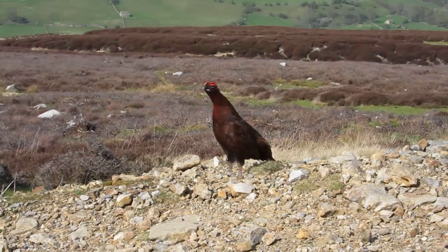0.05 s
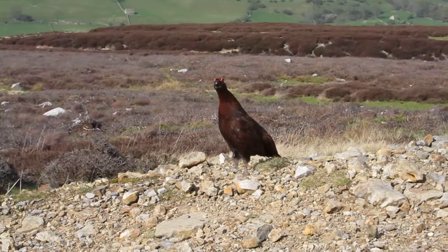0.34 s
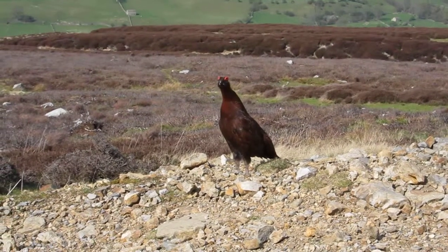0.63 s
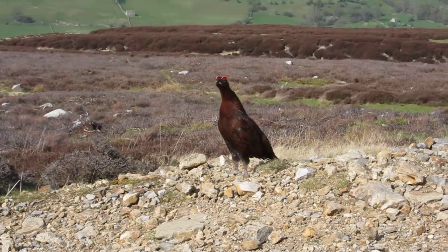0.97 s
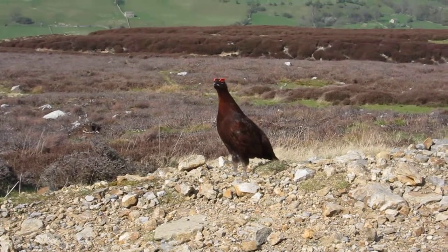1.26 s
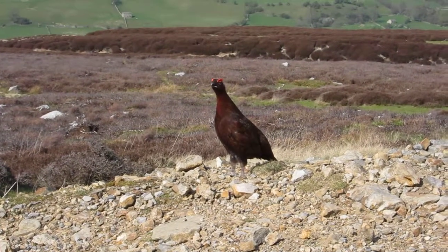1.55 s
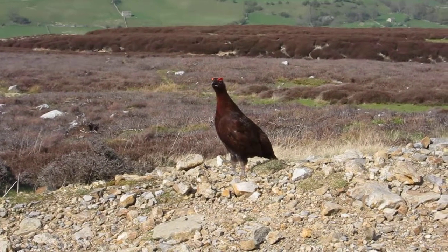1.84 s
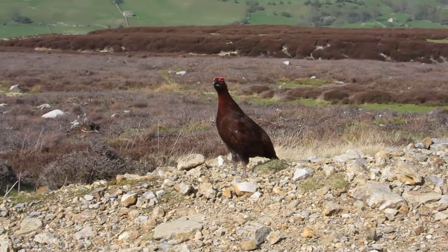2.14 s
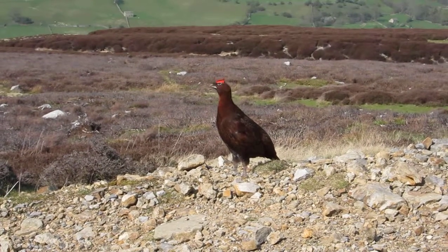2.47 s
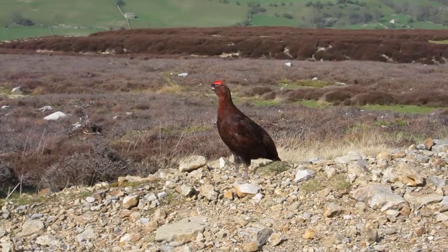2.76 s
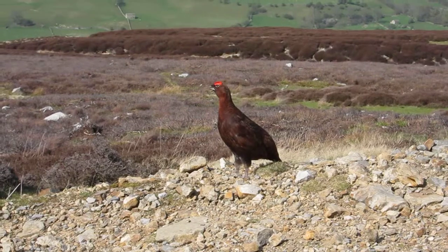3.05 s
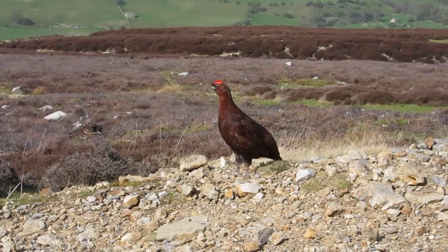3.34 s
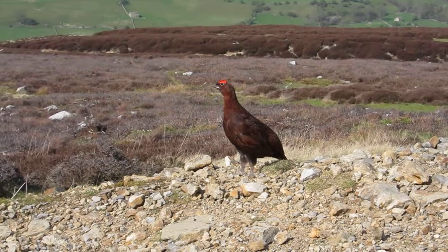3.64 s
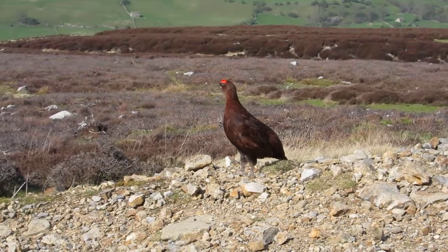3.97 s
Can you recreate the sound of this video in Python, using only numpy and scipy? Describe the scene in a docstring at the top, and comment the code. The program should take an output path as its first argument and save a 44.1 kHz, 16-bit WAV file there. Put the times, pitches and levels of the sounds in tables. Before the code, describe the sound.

A grouse rattles off harsh, quickening croaks that fade into clucks, with light wind.

```python
"""Open moorland: a red grouse rattles ten harsh croaks that speed up and shorten, two clucks, six ticks.
Each croak is eight syrinx pulses that ring throat and bill and scatter off stones and heather.
Wind buffets the microphones over a faint hiss; the camera whines thinly, and clicks and rustles
as it is handled."""
import sys
import numpy as np
from scipy import signal
from scipy.fft import rfft, irfft
from scipy.io import wavfile
from scipy.ndimage import uniform_filter1d

SR = 44100
rng = np.random.default_rng(int(sys.argv[2]) if len(sys.argv) > 2 else 0)


def to_wav(sig):
    """Store sig (one row per channel, or 1-D mono) as 16-bit WAV at the path in sys.argv[1].

    Samples outside -1..1 are clipped; the rate is SR.
    """
    pcm = np.clip(np.atleast_2d(sig), -1, 1) * 32767
    pcm = np.round(pcm).astype(np.int16)
    wavfile.write(sys.argv[1], SR, pcm.T)  # frames by channels


N = 176400
T = np.arange(N) / SR
FREQS = np.arange(N // 2 + 1) * SR / N
PULSE_SAMPLES = 2048


def undb(db):
    """Decibels to gain."""
    return 10 ** (np.asarray(db) / 20)


def unit(x):
    """Scale to rms 1."""
    return x / np.sqrt(np.mean(x ** 2))


def over_time(rows, column=1):
    """Interpolate one column linearly; column 0 is time in seconds."""
    return np.interp(T, np.array(rows)[:, 0], np.array(rows)[:, column])


def over_pitch(rows, freqs=FREQS):
    """Interpolate (Hz, value) rows over log frequency."""
    hz, value = np.array(rows, float).T
    return np.interp(np.log(freqs + 1), np.log(hz + 1), value)


def minimum_phase(db):
    """Causal frequency response from a dB curve."""
    cepstrum = irfft(np.log(undb(db)))
    cepstrum[1:len(db) - 1] *= 2
    cepstrum[len(db):] = 0
    return np.exp(rfft(cepstrum))


def noise(colour):
    """Noise shaped by (Hz, dB) rows, rms 1."""
    return unit(irfft(rfft(rng.standard_normal(N)) * undb(over_pitch(colour))))


def wide_noise(colour):
    """Stereo noise; the sides decorrelate towards the treble, the left leads."""
    uncorrelated_hz, lag_s = 6000, .00014
    side = irfft(rfft(noise(colour)) * np.clip(FREQS / uncorrelated_hz, 0, 1))
    left, right = noise(colour) + np.array([side, -side])
    return unit(np.array([left, np.roll(right, int(lag_s * SR))]))


def drift(rate_hz):
    """Smooth random drift, rms 1."""
    hold = int(SR / rate_hz)
    steps = np.repeat(rng.standard_normal(N // hold + 1), hold)
    return unit(uniform_filter1d(steps, hold)[:N])


def hiss_and_whine():
    """Open-air hiss and the camera's thin whine, slowly growing together."""
    # Each row: time in seconds, relative level in dB.
    levels = [(0, -62.5), (.8, -58.5), (1.4, -57.5), (2.1, -54), (3.2, -51.5), (4, -50)]
    # Each row: frequency in Hz, hiss level in dB.
    hiss_colour = [(290, -27), (500, -8.5), (631, -7.5), (1030, -8), (1690, -8.5), (6420, -21),
                   (7310, -31.5), (8330, -40), (8700, -28), (16000, -27)]
    whine_hz = 8806 + 5 * drift(30)
    whine = undb(-21.5) * unit(np.sin(2 * np.pi * np.cumsum(whine_hz) / SR))
    hiss = wide_noise(hiss_colour) * undb(.6 * drift(9.1))
    return (hiss + whine) * undb(over_time(levels) - 1.5)


def handling():
    """Small clicks and one brushing rustle at the camera."""
    # Each row: start in seconds, relative level in dB, tilt in dB per octave.
    clicks = [(1.619, -49, -7.5), (1.96, -38, 9.5), (2.352, -42, -5), (2.363, -43, -5.5), (2.966, -37, 6.5),
              (2.971, -39.5, 0.5), (3.363, -48, 2), (3.620, -40.5, 1), (3.868, -40, -5.5), (3.95, -45, 2),
              (3.958, -44.5, -1.5)]
    # Each row of both spectra: frequency in Hz, level in dB.
    click_colour = [(300, -18.5), (950, 8), (2500, -2), (3700, -8.5), (5200, -5.5), (9000, -38),
                    (16000, -29)]
    rustle_colour = [(350, -18), (600, -19), (1280, -2), (4110, -6.5), (5950, -14.5), (7020, -17),
                     (8390, -41), (8740, -22.5), (16000, -17)]
    decay_s = .003
    out = np.zeros((2, N))
    for at_s, db, tilt in clicks:
        colour = [(hz, level + tilt * np.log2(hz)) for hz, level in click_colour]
        envelope = (T >= at_s) * np.exp(-np.abs(T - at_s) / decay_s)
        out += wide_noise(colour) * undb(db + 5.5) * envelope
    start_s, end_s, rise_s, fall_s = 3.605, 4.026, .013, .34
    swell = np.clip((T - start_s) / rise_s, 0, 1) * np.clip((end_s - T) / fall_s, 0, 1)
    rustle = wide_noise(rustle_colour) * swell * undb(-49 + drift(40))
    return out + rustle


def wind():
    """Gusts rumble on each microphone, with a few sharp buffets."""
    # Each row: time in seconds, relative level in dB, left minus right in dB.
    gusts = [(0.0, -30.5, -2), (0.07, -25, 3), (0.39, -36.5, -12.5), (0.41, -35, 4.5), (0.62, -34, -12),
             (0.79, -33, 18.5), (0.83, -27, -13), (0.86, -35, 0.5), (1.75, -36, -4), (1.83, -25.5, 11.5),
             (1.89, -32.5, 17), (1.93, -38, 2), (2.09, -38, 3.5), (2.13, -30.5, -13.5), (2.25, -29.5, 9.5),
             (2.49, -35, -12), (2.6, -31, 7.0), (2.65, -35, 4), (2.71, -36.5, -7.5), (2.83, -41.5, 9),
             (2.88, -37, -11), (2.99, -40.5, 7.5), (3.05, -32.5, -1.5), (3.34, -34.5, 7), (3.38, -35, -8.5),
             (3.46, -31.5, 7), (3.54, -31.5, 1), (3.58, -30, 15.5), (3.6, -35.5, 3), (3.71, -39.5, -5.5),
             (3.82, -40.5, 14.0), (4.0, -39, 4.5)]
    # Each row: frequency in Hz, level in dB.
    colour = [(12, -24), (20, -9), (54, 0), (112, -4.5), (183, -12), (236, -17.5), (341, -25.5),
              (476, -34.5), (900, -48), (1170, -46), (1980, -120)]
    # Each row: centre in seconds, envelope peak in dB before panning, pitch in Hz, width in seconds.
    buffets = [(0.069, -16, 176, 0.007), (0.306, -24.5, 140, .007), (0.831, -17.5, 253, 0.0026),
               (1.81, -12.5, 148.3, 0.0033), (1.878, -17, 127, 0.0051), (2.133, -30, 123.7, 0.012),
               (3.055, -32, 226, .005), (2.295, -24.5, 203, .004), (3.129, -21, 167, 0.011),
               (3.483, -20, 128, 0.0063), (3.569, -15, 115, 0.0066)]
    shared_power = .22
    common = np.sqrt(shared_power) * noise(colour)
    rumble = np.array([common + np.sqrt(1 - shared_power) * noise(colour) for _ in range(2)])
    flutter_db = drift(25.24)
    out = rumble * undb(over_time(gusts) + 1.5 + flutter_db)
    for at_s, db, hz, width_s in buffets:
        phase_rad = rng.normal(0, .78, (2, 1))
        envelope = undb(db) / (1 + ((T - at_s) / width_s) ** 2) ** 2
        out += envelope * np.cos(2 * np.pi * hz * (T - at_s) + phase_rad)
    pan_db = over_time(gusts, column=2)
    return out * undb([pan_db / 2, -pan_db / 2])


def scatter(x, db, t60_s):
    """Decaying, dulled reflections off stones and heather, alike at both microphones."""
    tail = rng.standard_normal(N) * undb(-60 * T / t60_s)
    lowpass = 1 / np.hypot(1, FREQS / 4000)
    return undb(db) * irfft(rfft(x) * rfft(tail) * lowpass / np.linalg.norm(tail))


def syrinx():
    """List pulses as (start s, body dB, treble dB, resonance Hz, ring dB); a soft one leads each note."""
    # Each row: start in seconds, relative level in dB, nominal length in seconds, base pulse rate in Hz,
    # opening resonance in Hz, bill ring in dB.
    croaks = [(.017, -0.5, 0.023, 221.8, 1650, -1.5), (.0976, 0, 0.024, 225, 1650, -2),
              (0.1787, 0.5, 0.024, 229.6, 1700, -0.5), (0.2593, 0.5, 0.023, 231.7, 1750, -8),
              (0.3358, 1, 0.02, 236.4, 1850, -1.5), (0.4075, -0.5, 0.02, 238.1, 1950, -4.5),
              (0.471, 0, 0.018, 235.4, 2050, 0), (0.532, 0, 0.016, 227, 2080, 4.5),
              (0.5874, -2, 0.014, 217.8, 2000, 11), (0.6388, -4.5, 0.013, 201.6, 2000, 9)]
    # Two clucks, then six ticks, one main pulse each. Each row: start in seconds, relative level in dB.
    clucks = [(.6937, -12), (0.7835, -18), (.8752, -34), (0.9191, -35), (.9640, -35), (1.0084, -32.5),
              (1.0550, -29), (1.1036, -28.5)]
    lead_s, jitter, shimmer_db = .0063, .008, .5
    crest_share, onset_db, release_db = .48, -4, -13
    crest_hz, end_hz = 2270, 2060  # the resonance scoops up, then sinks
    pulses = []
    for start_s, db, length_s, rate_hz, start_hz, ring_db in croaks:
        lead_db = db - 16 - 26 * start_s  # fainter as the rattle goes on
        pulses.append((start_s - lead_s, lead_db, lead_db, start_hz, ring_db))
        age_s = 0
        for k, (late, strong) in enumerate(rng.standard_normal(size=(8, 2))):
            progress = age_s / length_s
            opening = max(1 - progress / crest_share, 0)
            closing = max(progress - crest_share, 0) / (1 - crest_share)
            effort_db = db + shimmer_db * strong
            body_db = effort_db + onset_db * opening + release_db * closing ** 1.5
            treble_db = effort_db + 3 - 16 * progress ** 2  # strongest at the onset
            hz = crest_hz + (start_hz - crest_hz) * opening + (end_hz - crest_hz) * closing
            pulses.append((start_s + age_s, body_db, treble_db, hz, ring_db))
            stretch = (1.25, 1.05)[k] if k < 2 else 1 + .07 * closing  # first and last cycles run long
            age_s += stretch * (1 + jitter * late) / rate_hz
    cluck_hz, cluck_ring_db = 2120, 15.5
    for start_s, db in clucks:
        for at_s, body_db in ((start_s - lead_s, db - 19), (start_s, db)):
            pulses.append((at_s, body_db, body_db - 4.5, cluck_hz, cluck_ring_db))
    return pulses


def throat_pulse(body_db, treble_db, resonance_hz, ring_db):
    """One pulse, its weaker rebound and a puff of rasping air ring throat and bill."""
    # Throat and bill response. Each row: frequency in Hz, relative gain in dB.
    throat = [(150, -22), (330, -13.5), (450, -14), (680, -5.5), (900, -17.5), (1050, -32.5), (1200, -23.5),
              (1400, -20), (1850, -16.5), (2100, -11), (2380, -14.5), (2600, -19.5), (2950, -29.5),
              (3400, -21.5), (4000, -16.5), (4350, -33.5), (5000, -39.5), (5600, -26), (6300, -41.5),
              (7050, -31.5), (8000, -46.5), (9000, -42), (10200, -47), (11400, -41), (14500, -42.5),
              (16000, -59.5)]
    chest_hz, chest_follow, treble_hz = 1000, .48, 4600  # the low band follows the effort less
    peak_db, peak_width_hz, ring_hz, ring_width_hz = 18, 398, 5343, 190
    rebound_s, rebound_db, rasp_decay_s, low_rasp_db = .002446, -8, .003, -14
    f = np.fft.rfftfreq(PULSE_SAMPLES, 1 / SR)
    chest = 1 / (1 + (f / chest_hz) ** 8)
    treble = 1 - 1 / (1 + (f / treble_hz) ** 8)
    effort_db = body_db * (1 - chest * (1 - chest_follow)) * (1 - treble) + treble_db * treble
    resonance_db = peak_db / (1 + ((f - resonance_hz) / peak_width_hz) ** 2)
    bill_db = ring_db / (1 + ((f - ring_hz) / ring_width_hz) ** 2)
    tract = minimum_phase(over_pitch(throat, f) + effort_db + resonance_db + bill_db + 21.5)
    puff = rng.standard_normal(PULSE_SAMPLES) * np.exp(-T[:PULSE_SAMPLES] / rasp_decay_s)
    rasp = rfft(puff / np.linalg.norm(puff)) * undb(low_rasp_db * (1 - treble))
    rebound = undb(rebound_db) * np.exp(-2j * np.pi * f * rebound_s)
    fade = np.hanning(2 * PULSE_SAMPLES)[PULSE_SAMPLES:]
    return irfft((1 + rebound + rasp) * tract) * fade


def grouse():
    """Syrinx pulses through the throat; level and phase differ between the two microphones."""
    # Each row: frequency in Hz, left minus right in dB.
    pan = [(60, -1.0), (110, -1.5), (200, -3.5), (380, 0), (700, -0.5), (1290, 0.5), (2380, -6),
           (4400, 4.5), (8120, -4), (15000, 0.0)]
    # Each row: frequency in Hz, phase lead of the left in radians.
    phase = [(0, 0), (1810, -0.11), (2580, 0.6), (4130, -0.6), (4390, 0.24), (5770, -0.2), (7840, 0.53),
             (9470, -0.4), (10200, 0.4), (11200, -0.29), (12400, 2.0), (12700, 1.5), (14100, 0.5),
             (16000, 0.1)]
    voice = np.zeros(N)
    for at_s, *pulse in syrinx():
        i = max(int(at_s * SR), 0)
        voice[i:i + PULSE_SAMPLES] += throat_pulse(*pulse)
    left_gain = undb(over_pitch(pan) / 2) * np.exp(.5j * over_pitch(phase))
    return irfft(rfft(voice) * np.array([left_gain, 1 / left_gain]))


def scene():
    """The bird, its near and far reflections, wind, hiss and camera noises."""
    bird = grouse()
    near = scatter(bird, db=-15, t60_s=.045)
    far = scatter(bird, db=-42, t60_s=.25)
    return bird + near + far + wind() + hiss_and_whine() + handling()


def record(dry):
    """The camera notches out a narrow treble band and cuts the top."""
    notch_hz, notch_width_hz, top_hz = 8220, 700, 15700
    notch = 1 - np.exp(-((FREQS - notch_hz) / (notch_width_hz / 2)) ** 4)
    lowpass = signal.ellip(8, .2, 70, top_hz, fs=SR, output="sos")
    return signal.sosfilt(lowpass, irfft(rfft(dry) * notch))


dry = scene()
out = record(dry)
to_wav(out)
```